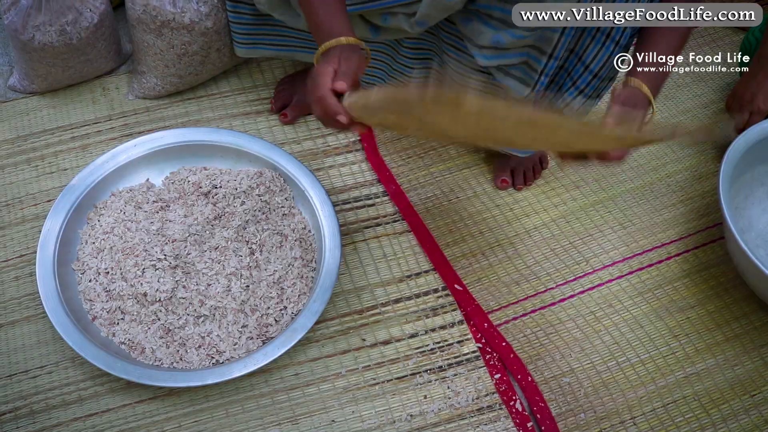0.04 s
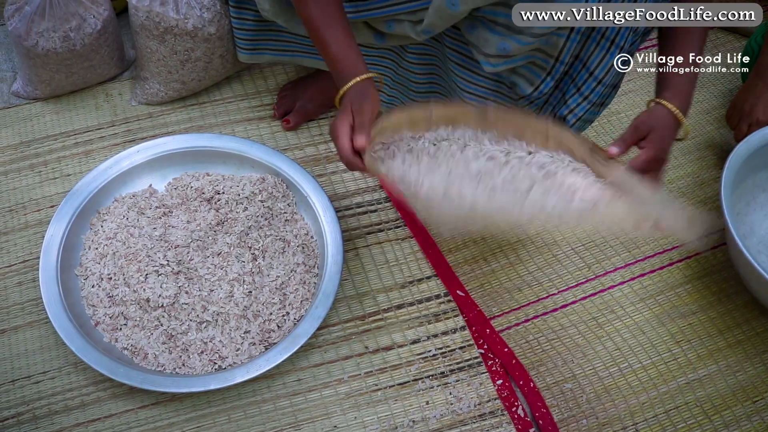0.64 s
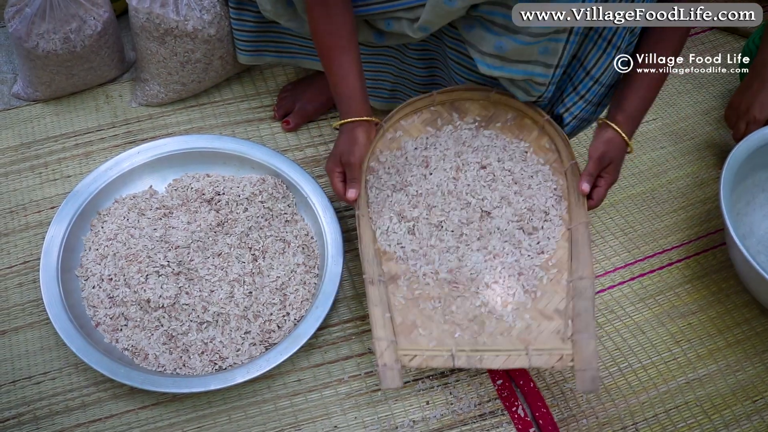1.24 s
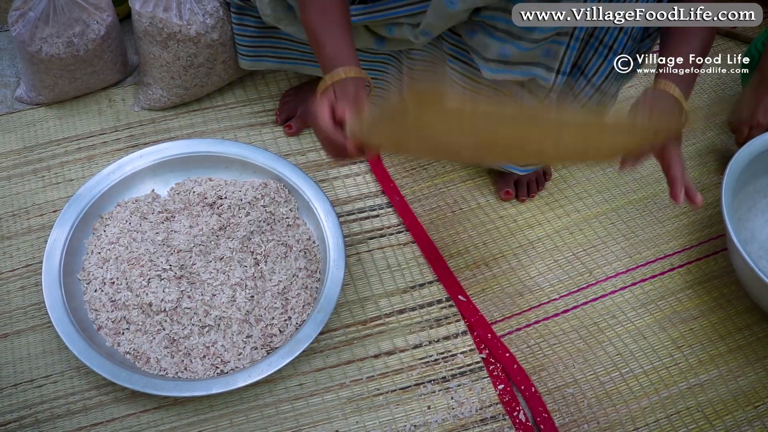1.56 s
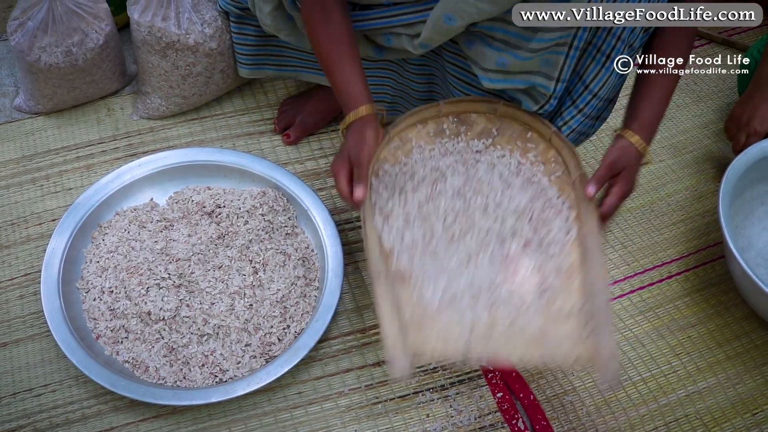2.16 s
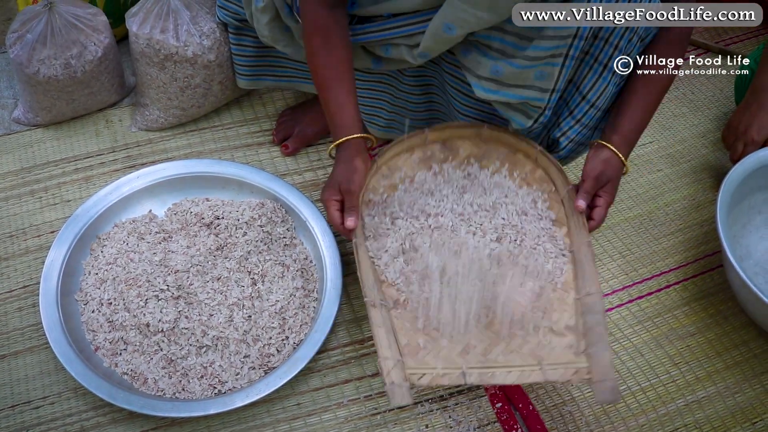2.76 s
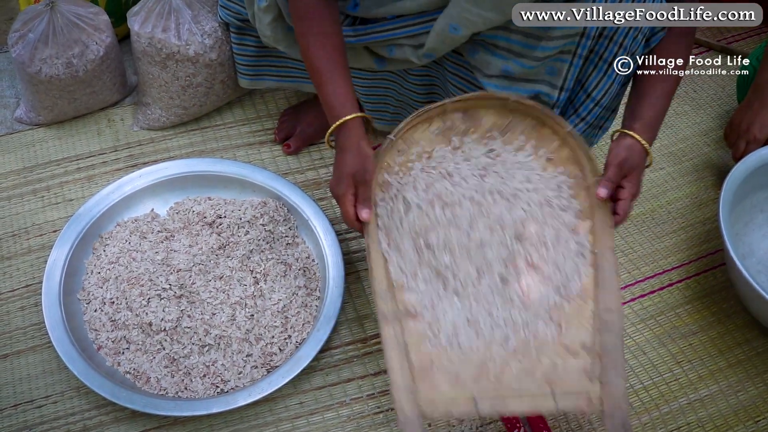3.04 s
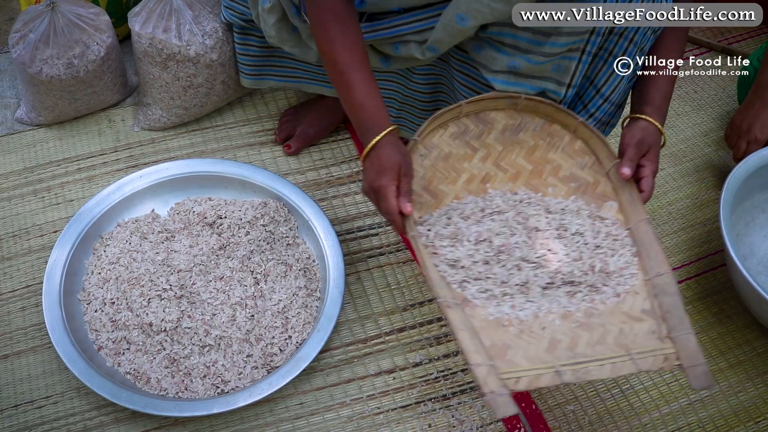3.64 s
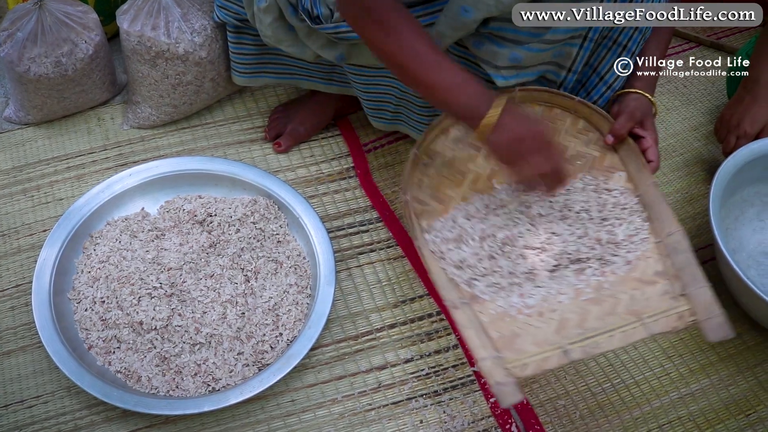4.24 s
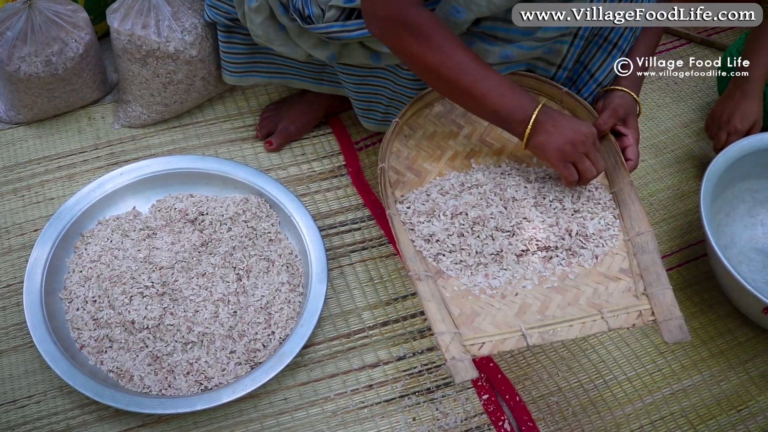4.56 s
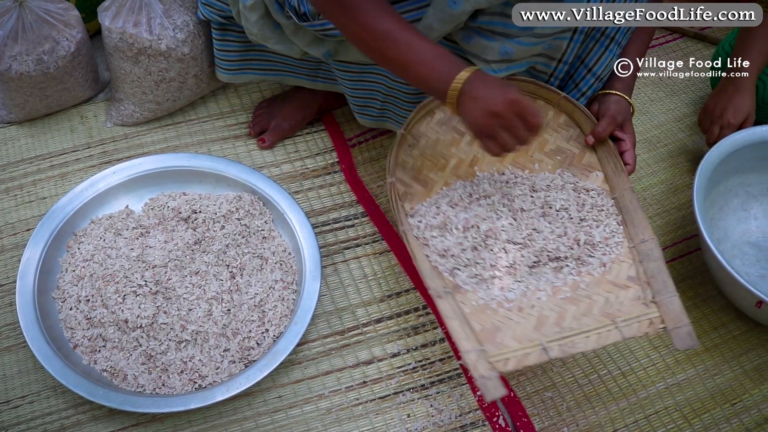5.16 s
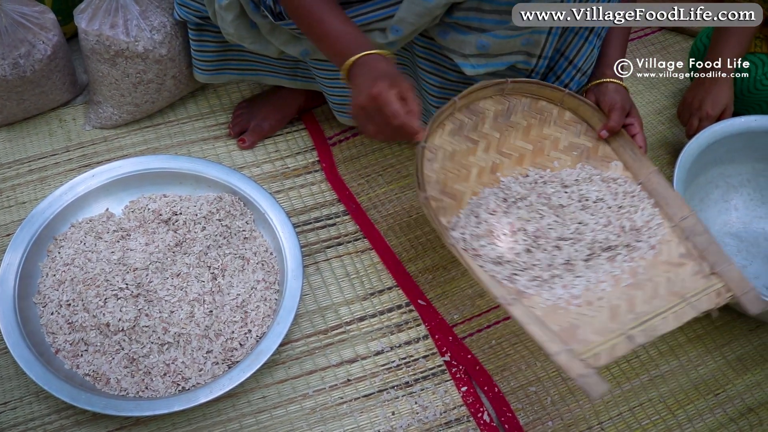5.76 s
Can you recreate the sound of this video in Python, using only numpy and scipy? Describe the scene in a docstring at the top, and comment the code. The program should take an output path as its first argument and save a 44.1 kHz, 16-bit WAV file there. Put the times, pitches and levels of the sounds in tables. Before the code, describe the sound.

Grain swishes and patters on a winnowing tray with hand knocks between tosses, giving way to faint ticks, small birds and shrill insects.

```python
"""Outdoors among trees, rice is winnowed in a woven bamboo tray close to the microphone.
Four times the grain is tossed, rains back and slides: thousands of small impacts rattle, hiss and drum
on the weave. Between tosses a hand knocks the tray and excites its modes. Then the grain is shaken level
and picked over, with soft bumps and ticks. Behind it lie the hiss of open air, a shrill band of insects
and the whistles of small birds, scattered by the trees."""
import sys
import numpy as np
from scipy import signal
from scipy.fft import rfft, irfft, next_fast_len
from scipy.io import wavfile

SR = 44100
rng = np.random.default_rng(int(sys.argv[2]) if len(sys.argv) > 2 else 0)


def store_pcm(level_fs):
    """Save levels as 16-bit WAV."""
    pcm = np.round(np.clip(level_fs, -1, 1) * 32767).astype(np.int16)
    wavfile.write(sys.argv[1], SR, np.atleast_2d(pcm).T)


N = 264159
TIME = np.arange(N) / SR


def gain_of(db):
    """Amplitude grows tenfold for every 20 dB."""
    return 10 ** (np.asarray(db) / 20)


def unit_rms(x):
    """Normalisation to a mean power of one."""
    return x / np.sqrt(np.mean(x ** 2) + 1e-20)


def curve_at(points, hz):
    """Interpolation on a logarithmic frequency axis."""
    f, value = np.transpose(points)
    return np.interp(np.log(hz + 1), np.log(f + 1), value)


def add(mix, start_s, sound):
    """Superposition: a sound adds to the mix from its start time on."""
    part = mix[..., max(round(start_s * SR), 0):][..., :sound.shape[-1]]
    part += sound[..., :part.shape[-1]]


def filtered(x, response):
    """Filtering multiplies the spectrum by a response, here a function of Hz."""
    size = next_fast_len(x.shape[-1] + 2048, True)
    return irfft(rfft(x, size) * response(np.fft.rfftfreq(size, 1 / SR)), size)[..., :x.shape[-1]]


def colour(x, points, size=4096):
    """A minimum-phase filter imposes a spectrum, falling 20 dB per octave beyond its ends."""
    hz = abs(np.fft.fftfreq(size, 1 / SR)) + 1
    octaves_outside = abs(np.log2(hz / np.clip(hz, points[0][0], points[-1][0])))
    log_gain = np.log(gain_of(np.maximum(curve_at(points, hz) - 20 * octaves_outside, -100)))
    taps = np.fft.ifft(np.exp(np.conj(signal.hilbert(log_gain)))).real[:size // 2]
    return signal.oaconvolve(x, taps[None], axes=1)[:, :x.shape[1]]


def drift(hz, size=N):
    """Low-passed noise of rms 1 wanders at rates up to about hz."""
    return unit_rms(filtered(rng.standard_normal(size), lambda f: np.exp(-(f / hz) ** 2)))


def stereo_pair(x, coherence):
    """Partial coherence: left and right are the weighted sum and difference of two unrelated signals."""
    angle = lambda f: np.arccos(np.clip(curve_at(coherence, f), -1, 1)) / 2
    mid = filtered(x[0], lambda f: np.cos(angle(f)))
    side = filtered(x[1], lambda f: np.sin(angle(f)))
    return np.array([mid + side, mid - side])


# Open air and far-off life. Each row: frequency in Hz, relative spectral density in dB.
AIR_SPECTRUM = [(20, -20), (50, -2.5), (85, 1.5), (120, -3.5), (300, -3.5), (420, -8.5), (650, -12),
                (1400, -16), (2300, -13.5), (3200, -10.5), (4200, -13.5), (5000, -17), (7500, -22.5),
                (12000, -29), (16000, -37)]
# Likeness of the air at the two microphones. Each row: frequency in Hz, coherence from 0 to 1.
AIR_COHERENCE = [(100, .92), (350, 0.75), (900, 0.13), (2500, 0.018)]


def air(level_db=-47, swell_db=1.5, rumble_hz=300, ebb_db=3.6):
    """A diffuse field is coherent only in the bass. Its rumble swells; bands of far chatter ebb singly."""
    wash = colour(stereo_pair(rng.standard_normal((2, N)), AIR_COHERENCE), AIR_SPECTRUM)
    rumble = filtered(wash, lambda f: 1 / (1 + (f / rumble_hz) ** 4))
    out = wash + rumble * (gain_of(swell_db * drift(27)) - 1)
    for hz in (2200, 3200, 4200):
        chatter = filtered(wash, lambda f: np.exp(-((f - hz) / 550) ** 2))
        out += chatter * (gain_of(ebb_db * drift(4.4)) - 1)
    return gain_of(level_db) * unit_rms(out)


# Three very high pips, with a short rasp on the middle one, are heard twice, 1.2 s apart.
PIP_STARTS_S, PIP_STEP_S = (4.12, 5.323), .238
# The insect chorus. Each row: frequency in Hz, relative spectral density in dB.
INSECT_SPECTRUM = [(4700, -37), (5200, -11.5), (5600, -2), (5870, 0.5), (6160, -3), (6450, -11),
                   (6750, -47), (8500, -33), (9050, -18.5), (9600, -42), (11000, -39), (12000, -34),
                   (13000, -40)]


def insects(chorus_db=-45, flutter_db=.35, swell_db=1.5, rasp_db=-52.5, rasp_s=.018, left_db=.95):
    """Incoherent sources sum to noise: far insects merge into a shrill band. A rasp is heard twice."""
    chorus = colour(rng.standard_normal((2, N)), INSECT_SPECTRUM)
    chorus *= gain_of(flutter_db * drift(110) + swell_db * drift(1.6))
    out = gain_of(chorus_db) * unit_rms(chorus)
    rasp = colour(rng.standard_normal((2, N)), [(6800, -25), (8300, 2), (10300, -5), (12000, -20)])
    for start in PIP_STARTS_S:
        age = np.maximum(TIME - start - PIP_STEP_S, 0) / rasp_s
        out += gain_of(rasp_db) * age * np.exp(1 - age) * unit_rms(rasp)
    return out * gain_of([[left_db], [-left_db]])


def whistle(length_s, first_hz, last_hz, db, hoarse=.016):
    """Fast random frequency modulation spreads a gliding tone into sidebands, heard as hoarseness."""
    hz = np.geomspace(first_hz, last_hz, round(length_s * SR))
    cycles = np.cumsum(hz * (1 + hoarse * drift(450, len(hz)))) / SR
    fade = signal.windows.tukey(len(hz), min(.03 / length_s, .8))
    return gain_of(db) * np.sqrt(2) * fade * np.sin(2 * np.pi * cycles)


# Whistles of far birds. Each row: start in seconds, length in seconds, first and last pitch in Hz,
# source level in dB, hoarseness as a fraction of the pitch.
BIRD_NOTES = [(3.718, 0.038, 4460, 4130, -50, .02), (3.876, 0.074, 1932, 1550, -47.5, 0.032),
              (4.257, 0.11, 3000, 3070, -52, .022), (4.743, 0.051, 2516, 2267, -42.5, 0.057),
              (4.871, 0.042, 3900, 2560, -44.5, 0.055), (4.888, 0.0464, 2590, 2205, -43.5, 0.074),
              (5.143, .05, 1864, 1494, -52, 0.083), (5.453, .094, 3060, 2990, -53, 0.015),
              (5.935, 0.057, 2510, 2250, -43.5, 0.057)]
# Trills of falling chips. Each row: start in seconds, number of chips, top pitch in Hz, source level in dB.
BIRD_TRILLS = [(0.078, 3, 6350, -36), (2.96, 1, 6140, -39), (3.285, 2, 5782, -35.5), (3.92, 3, 6250, -35.5),
               (4.11, 2, 5500, -53), (5.017, 2, 5730, -41), (5.149, 2, 6130, -35)]


def far_calls(chip_s=.0218, chip_step_s=.0275, chip_fall=.825, pip_s=.018, pip_hz=(8500, 8250)):
    """Notes, chips and pips are all short frequency sweeps of a single tone."""
    song = np.zeros(N)
    for start, *note in BIRD_NOTES:
        add(song, start, whistle(*note))
    for start, count, hz, db in BIRD_TRILLS:
        for k in range(round(count)):
            add(song, start + k * chip_step_s, whistle(chip_s, hz, hz * chip_fall, db))
    for start in PIP_STARTS_S:
        for k, db in enumerate((-57, -57, -51)):
            add(song, start + k * PIP_STEP_S, whistle(pip_s, *pip_hz, db))
    return song


def birds(direct_db=-3, echo_db=-2, echo_t60_s=.83):
    """Scattering by trees gives far calls a decaying tail; one long, nearer whistle arrives directly."""
    song = far_calls()
    t = np.arange(SR // 2) / SR
    trees = rng.standard_normal((2, len(t))) * gain_of(-60 * t / echo_t60_s) * (1 - np.exp(-t / .0027))
    echo = signal.oaconvolve(song[None], trees / np.linalg.norm(trees[0]), axes=1)[:, :N]
    out = gain_of(direct_db) * song + gain_of(echo_db) * echo
    add(out, 3, whistle(length_s=.75, first_hz=5129, last_hz=4621, db=-52.5, hoarse=.2))
    return out


# Ticks of cane and fingernails. Each row: start in seconds, peak level in dB, centre frequency in Hz.
CANE_TICKS = [(2.202, -25, 2500), (2.234, -28.5, 1510), (2.96, -36, 3000), (3.003, -33, 1800),
              (3.095, -29, 4500), (3.981, -40, 9000), (4.244, -30, 2500), (4.899, -32, 8000),
              (5.001, -37, 8000), (5.062, -33, 8000), (5.18, -38, 9000), (5.444, -36, 2500)]


def ticks(decay_s=.002):
    """A brief transient has a broad spectrum: each dry snap only leans toward a pitch."""
    out, t = np.zeros((2, N)), np.arange(SR // 40) / SR
    for start, db, hz in CANE_TICKS:
        burst = rng.standard_normal((2, len(t))) * np.exp(-t / decay_s)
        snap = colour(burst, [(hz / 6, -10), (hz, 0), (hz * 3, -11)])
        add(out, start, gain_of(db) * snap / abs(snap).max())
    return out


# The hollow rub of cane on straw. Each row: frequency in Hz, relative spectral density in dB.
RIM_SPECTRUM = [(800, -30), (1080, -4), (1340, -1.5), (1550, -22), (7000, -19), (14000, -17)]


def rim_scrape(peak_s=3.67, db=-33.5, spread_s=.012):
    """Friction makes a short swell of noise as the rim of the tray shifts across the mat."""
    rub = unit_rms(colour(rng.standard_normal((2, N)), RIM_SPECTRUM))
    return gain_of(db) * np.exp(-((TIME - peak_s) / (2 * spread_s)) ** 2) * rub


# Modes of the tray. Each row: frequency in Hz, relative gain in dB, time to decay by 60 dB in seconds.
TRAY_MODES = [(212.6, -0.5, 0.2), (321.4, 8, 0.1), (385, 0, 0.11), (657, 0, 0.055), (958, -5, 0.034),
              (1054, -8, 0.022), (1540, -1.5, 0.043), (3300, -4, 0.019)]


def tray(blow, ring_db):
    """Modal resonance: a blow on the weave is heard directly and through the tray's damped modes."""
    t = np.arange(SR // 4) / SR
    ring = np.zeros(len(t))
    for hz, db, t60 in TRAY_MODES:
        unity_at_resonance = 2 * np.log(1000) / (t60 * SR)
        ring += unity_at_resonance * gain_of(db - 60 * t / t60) * np.cos(2 * np.pi * hz * t)
    return blow + gain_of(ring_db) * signal.oaconvolve(blow, ring[None], axes=1)[:, :blow.shape[1]]


# The hand meets the tray: three contacts to a knock between tosses, single soft bumps while picking.
# Each row: start in seconds, peak level in dB, spectral tilt in dB per octave.
HAND_CONTACTS = [(.931, -15, 0), (.946, -12.5, 2), (0.9566, -15.5, 0.5), (1.7222, -13, 1.5),
                 (1.7342, -11.5, 1.5), (1.7453, -13.5, -0.5), (2.5402, -17, -0.5), (2.553, -12.5, 0),
                 (2.564, -21, -1), (4.243, -39.5, -3), (5.068, -40.5, 2), (5.442, -40, -3)]
# The blow of a palm. Each row: frequency in Hz, relative spectral density in dB.
PALM_SPECTRUM = [(40, -26), (90, -2), (150, 1), (300, 0.5), (600, -1), (1050, -4), (1700, -11), (2500, -14),
                 (4000, -21), (8000, -24.5), (16000, -36)]


def knocks(dispersion=.0527, rattle=.096, rattle_s=.0071, palm_hz=5500, size=8192):
    """Dispersion: bending waves carry a blow's treble ahead of its bass. Loose strips rattle after it."""
    out, t = np.zeros((2, N)), np.arange(size) / SR
    for start, db, tilt_db in HAND_CONTACTS:
        strips = rattle * rng.standard_normal((2, size)) * np.exp(-t / rattle_s)
        strips *= 1 - np.exp(-t / .00023)
        blow = filtered(strips, lambda f: 2 * f / (f + 3000))
        blow[0] += signal.lfilter(*signal.butter(1, palm_hz, fs=SR), t == 0)  # the palm is soft
        tilt = lambda f: gain_of(tilt_db * np.log2(f / 800 + .1))
        blow = filtered(blow, lambda f: tilt(f) * np.exp(-4j * np.pi * dispersion * np.sqrt(f)))
        blow = tray(colour(blow, PALM_SPECTRUM), ring_db=4.5)  # the unloaded tray rings freely
        add(out, start, gain_of(db) * blow / abs(blow).max())
    return out


# Tossed grain lands. Each row: start, rise time, thickest moment and end in seconds, level in dB,
# relative weight of the husks' hiss at the start and at the end in dB.
GRAIN_SHOWERS = [(.180, 0.0056, 0.41, 0.51, -26.5, 0, -5.5), (1.068, 0.016, 1.178, 1.318, -23.5, -4.5, -3),
                 (1.881, 0.014, 1.976, 2.144, -23.5, -3.5, -5), (2.687, .006, 2.774, 2.904, -23, -8, -2)]


def showers(arch_db=15, stop_db=-6, stop_s=.0088, settle_db_per_s=168, drum_db=(-10.5, -6)):
    """Envelopes of rattle, drum and hiss: a shower arches, stops, then dies away in inelastic bounces."""
    envelopes = np.zeros((3, N))
    for start, rise_s, thickest, end, db, *hiss_db in GRAIN_SHOWERS:
        progress = np.clip((TIME - start) / (end - start), 0, 1)
        arch = -arch_db * (progress - (thickest - start) / (end - start)) ** 2
        after = np.maximum(TIME - end, 0)
        settle = stop_db * np.minimum(after / stop_s, 1) - settle_db_per_s * after
        onset = (1 + np.tanh((TIME - start) / (2 * rise_s))) / 2
        level = gain_of(db + arch + settle) * onset
        drum = gain_of(np.interp(progress, (0, 1), drum_db))  # the weave drums ever harder
        hiss = gain_of(np.interp(progress, (0, 1), hiss_db))
        envelopes += [level, level * drum, level * hiss]
    return envelopes


# Grain slides as the tray is tipped or shaken. Each row: fastest moment, rise time and fall time in
# seconds, level in dB, relative weights of drumming and of hiss in dB.
GRAIN_SLIDES = [(0.764, 0.069, 0.058, -32, -8, -4.5), (1.564, 0.066, 0.065, -36.5, -9, -7),
                (2.349, 0.047, 0.088, -38.5, -6, -10.5), (3.275, .17, 0.099, -37, -3.5, -10),
                (3.667, 0.041, 0.045, -33, -8.5, -8)]


def slides(rise_power=2.7, fall_power=1.77, brighten_db=4):
    """Envelopes of rattle, drum and hiss in granular flow: the heap gathers speed and comes to rest."""
    envelopes = np.zeros((3, N))
    for fastest, rise_s, fall_s, db, drum_db, hiss_db in GRAIN_SLIDES:
        offset = (TIME - fastest) / np.where(TIME < fastest, rise_s, fall_s)
        power = np.where(offset < 0, rise_power, fall_power)  # 2 is a bell shape, more is steeper
        level = gain_of(db) * np.exp(-np.minimum(abs(offset) ** power, 20))
        hiss = gain_of(hiss_db + brighten_db * np.tanh(offset))  # the husks hiss more toward the end
        envelopes += [level, level * gain_of(drum_db), level * hiss]
    return envelopes


def impacts(per_s, spread_db, snap_s, patches=16):
    """Shot noise: impacts of unequal size fall at random; each patch of the weave has its own snap."""
    chance = np.clip(per_s / SR, 0, 1)
    sizes = gain_of(spread_db * np.minimum(rng.exponential(1, N), 4))
    hits = sizes * (rng.random(N) < chance) / np.sqrt(chance + 1e-9)  # equal power at any rate
    patch, t = rng.integers(0, patches, N), np.arange(256) / SR
    spectra = rfft(rng.standard_normal((patches, 2, len(t))) * np.exp(-t / snap_s), 2 * len(t))
    spectra /= np.sqrt(np.mean(abs(spectra) ** 2, 0))  # white on average
    snaps = irfft(spectra * (-1j) ** np.arange(len(t) + 1))  # a short delay keeps each onset whole
    return unit_rms(sum(signal.oaconvolve((hits * (patch == k))[None], snaps[k], axes=1)[:, :N]
                        for k in range(patches)))


# A grain strikes grain, husk or the weave. Each row: frequency in Hz, relative spectral density in dB.
GRAIN_SPECTRUM = [(650, -21), (1100, -12.5), (1800, -5.5), (2200, -4), (2950, -0.5), (3600, -4.5),
                  (4300, -8), (5300, -8.5), (6800, -13.5), (10000, -18)]
HUSK_SPECTRUM = [(3000, -6), (4800, -0.5), (6000, -2.5), (7000, -1.5), (8300, 0), (10800, -4), (13000, -7),
                 (16000, -13)]
WEAVE_SPECTRUM = [(80, -42), (170, -13), (290, -2), (390, 2.5), (490, -1), (585, -3), (770, 4), (900, -2.5),
                  (1150, -0.5), (1600, -12.5), (3000, -38)]


def rice(full_per_s=7000, full_db=-24, thinning=.45, clump_db=1, rattle_db=.5, drum_db=-1, hiss_db=4):
    """Independent impacts add in power: the more grains move, the louder and denser the rattle."""
    rattle, drum, hiss = showers() + slides()
    per_s = full_per_s * (rattle / gain_of(full_db) + .013) ** thinning
    landings = impacts(per_s, spread_db=1, snap_s=.00053)
    brushes = impacts(1.4 * per_s, spread_db=2.5, snap_s=.00041)  # husk against husk
    weave = tray(colour(landings, WEAVE_SPECTRUM), ring_db=-15.5)  # the load damps the modes
    sound = gain_of(rattle_db) * rattle * unit_rms(colour(landings, GRAIN_SPECTRUM))
    sound += gain_of(drum_db) * drum * unit_rms(weave)
    sound += gain_of(hiss_db) * hiss * unit_rms(colour(brushes, HUSK_SPECTRUM))
    return sound * gain_of(clump_db * drift(52))  # the grain lands in clumps


# Likeness of the tray at the two microphones. Each row: frequency in Hz, coherence from 0 to 1.
TRAY_COHERENCE = [(300, .99), (900, .94), (2700, .77), (5500, .53), (10000, .42)]
# Stereo balance of the tray. Each row: frequency in Hz, left minus right level in dB.
TRAY_BALANCE = [(300, 1), (900, -1.5), (2700, -5), (5500, 0.3), (9000, -5), (14000, -0.8)]


def scene(lag_s=.000026):
    """Time and level differences place the tray a little to the right: its sound reaches the left later."""
    near = stereo_pair(rice() + knocks() + rim_scrape() + ticks(), TRAY_COHERENCE)
    balance = lambda f: gain_of(curve_at(TRAY_BALANCE, f) / 2)
    left = filtered(near[0], lambda f: balance(f) * np.exp(-2j * np.pi * f * lag_s))
    right = filtered(near[1], lambda f: 1 / balance(f))
    return np.array([left, right]) + birds() + insects() + air()


def record(dry, edge_hz=15950):
    """Band limiting: the recorder's steep low-pass filter removes the highest treble."""
    lowpass = signal.firwin(511, edge_hz, window=("kaiser", 9), fs=SR)
    return signal.oaconvolve(dry, lowpass[None], "same")


dry = scene()
out = record(dry)
store_pcm(out)
```